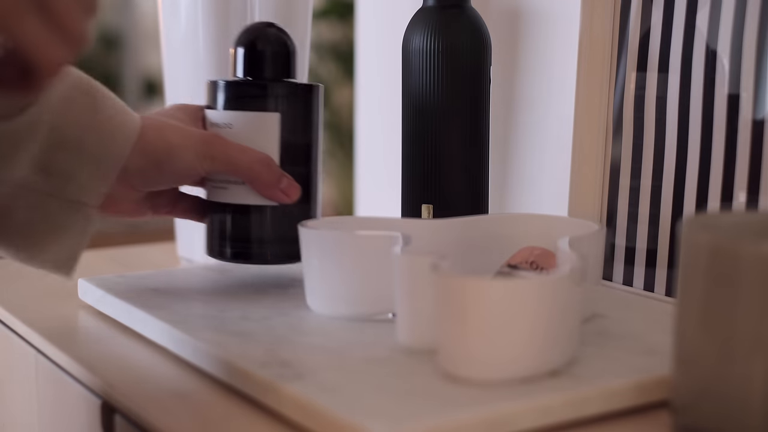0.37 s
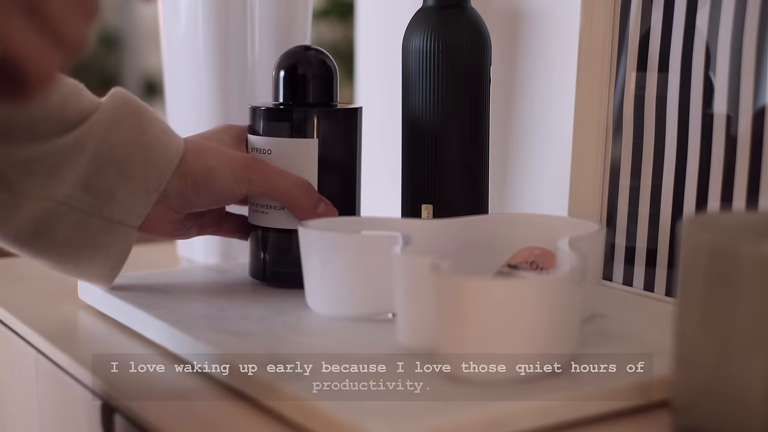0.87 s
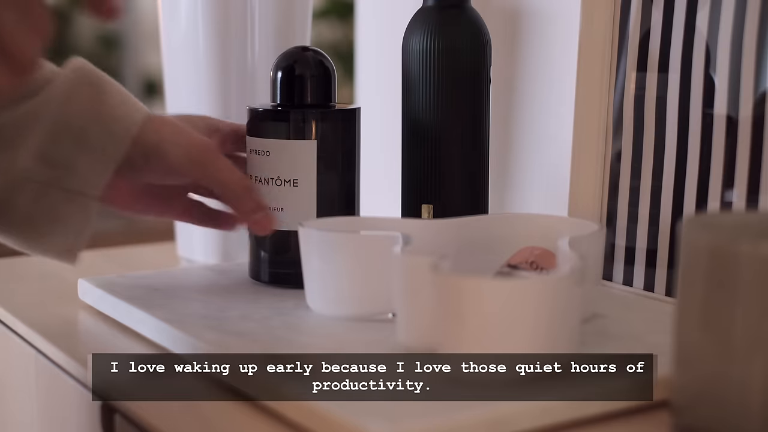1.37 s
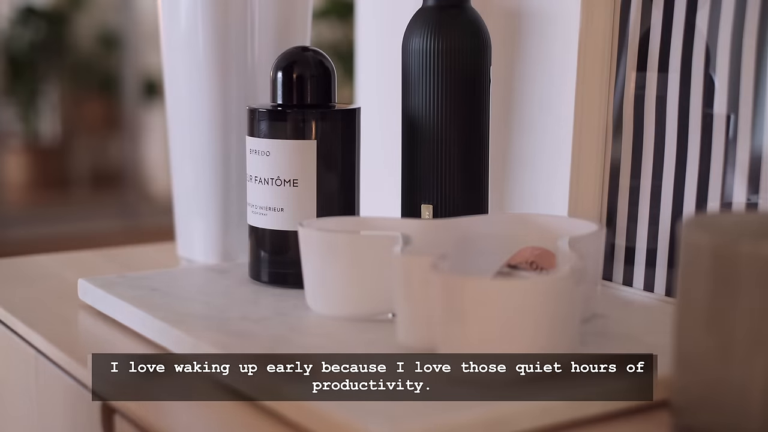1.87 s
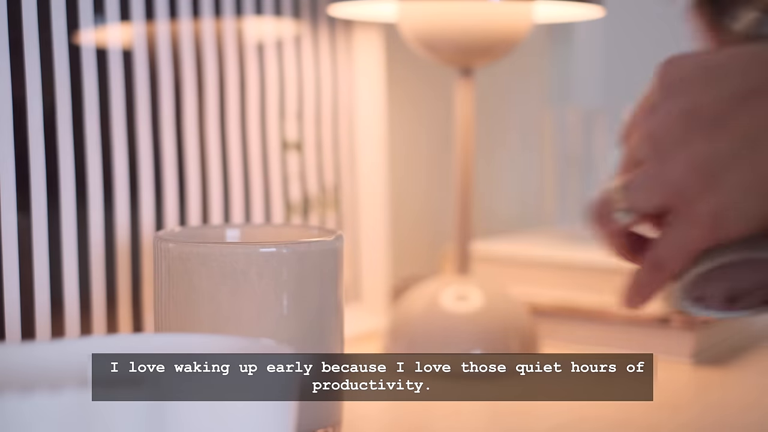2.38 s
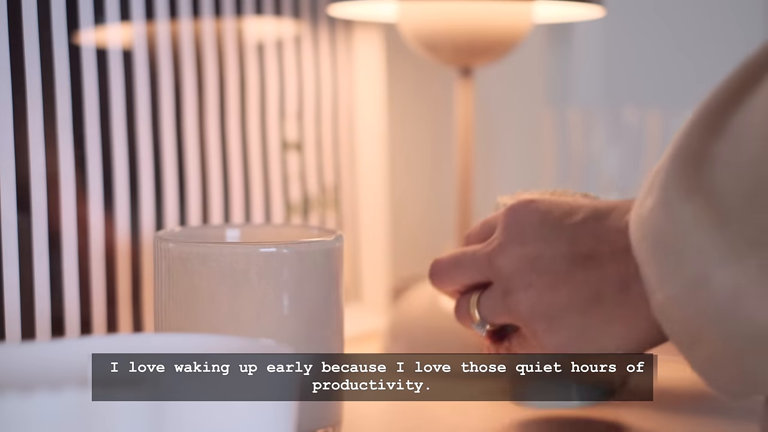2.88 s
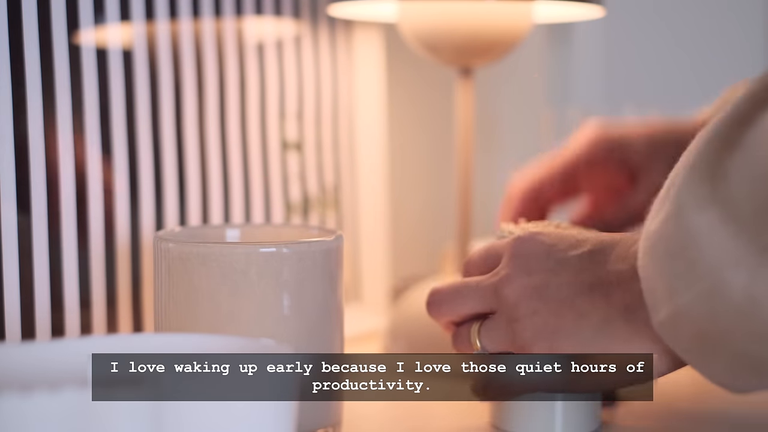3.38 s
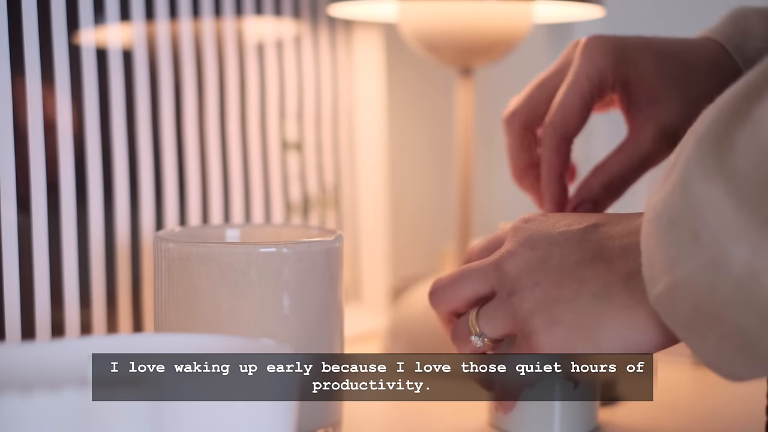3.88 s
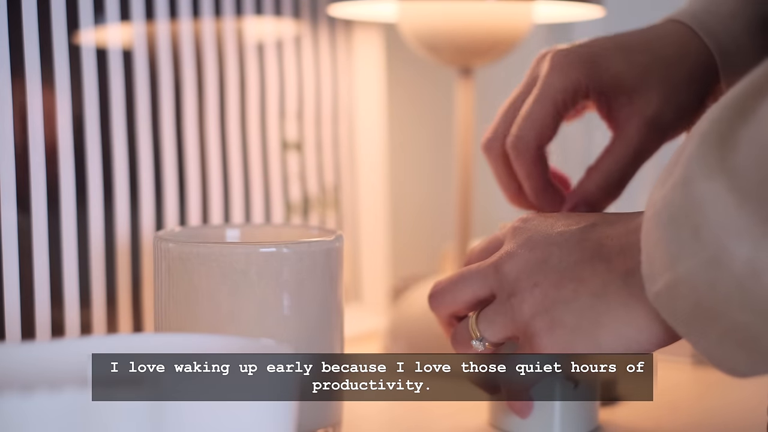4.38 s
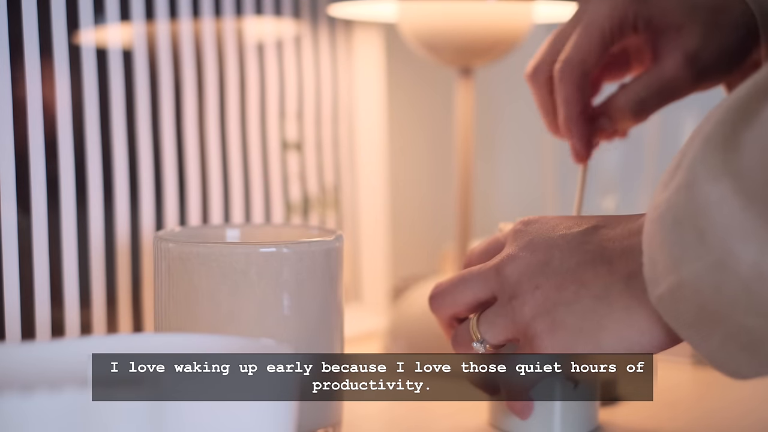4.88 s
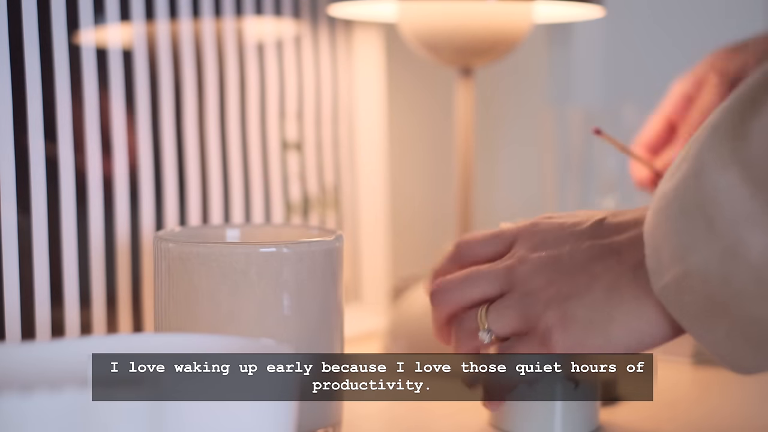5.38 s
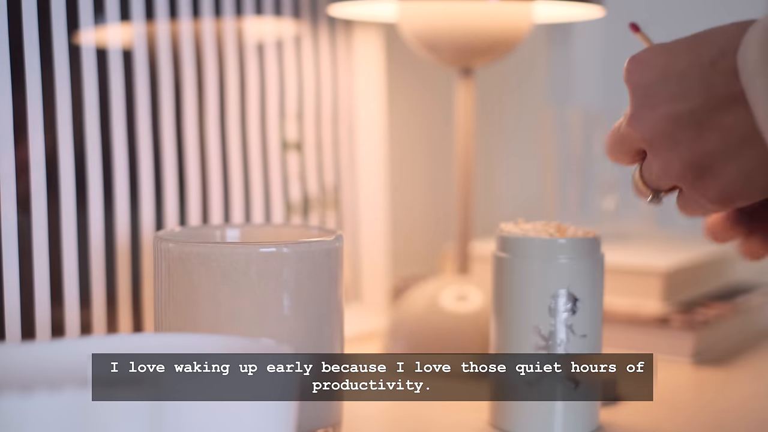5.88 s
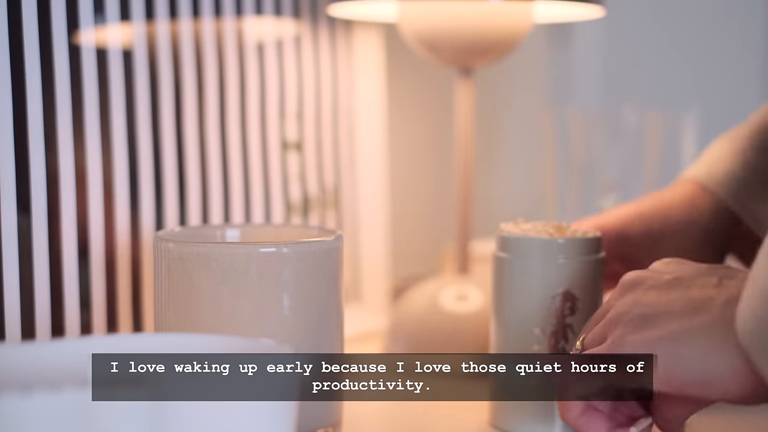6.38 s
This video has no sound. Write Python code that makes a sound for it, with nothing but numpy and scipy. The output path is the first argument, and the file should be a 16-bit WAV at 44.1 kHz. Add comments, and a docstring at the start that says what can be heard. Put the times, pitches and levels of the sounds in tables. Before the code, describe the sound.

In a quiet furnished room, a heavy glass bottle meets a stone slab with two crisp knocks and a small settling thump. A ceramic jar of long matches lands with a low thud and wooden rattle. Fingers stir the sticks in sparse dry clicks and pull one out. The jar scrapes briefly and a finger ring ticks on it. Close microphone, soft sleeve rustle, low air rumble and faint hiss.

```python
"""A glass bottle is set down on a stone slab, which rings like a set of dying sines; a sleeve brushes as soft noise.
A ceramic jar of long matches then lands on a table. Fingers stir the matches and draw one out: short noisy knocks
and fine clicks pass through wooden resonances. At the end the jar is slid aside and a finger ring ticks on it.
Air stirs at the microphone all along, in a quiet furnished room; one microphone feeds two channels,
and each channel adds its own hiss."""
import sys
import numpy as np
from scipy import signal
from scipy.fft import rfft, irfft
from scipy.io import wavfile

SR = 44100
rng = np.random.default_rng(int(sys.argv[2]) if len(sys.argv) > 2 else 0)


def field_ratio(decibels):
    """Amplitude ratio for a level in dB (20 dB per decade); scalars and array-likes work."""
    return 10 ** (np.asarray(decibels, dtype=float) / 20)


def output_pcm(signal):
    """Save a mono or channel-first signal as 16-bit PCM at the path in sys.argv[1].

    Samples are clipped to [-1, 1] before scaling.
    """
    pcm = np.clip(np.atleast_2d(signal).T, -1, 1) * 32767
    wavfile.write(sys.argv[1], SR, np.round(pcm).astype(np.int16))


N = 297278   # length in samples

# Source levels in the tables are before the gains in the functions.
# Bottle base meeting the slab: start_s, push_db, sharpness_hz
BOTTLE_CONTACTS = [(0.7353, -19.5, 1480), (0.7376, -29.5, 2140), (.95, -21.5, 1730), (0.9522, -36, 1590),
                   (1.214, -34, 400), (1.226, -33, 339), (1.243, -37, 300), (1.282, -46, 252)]
# Ringing of slab and bottle: pitch_hz, level_db, time_to_fall_60_db_s
SLAB_MODES = [(101.5, -22, 0.083), (157, -17, 0.117), (224, -10.5, 0.05), (319, -8, 0.02),
              (464, -5.5, 0.028), (663, -1, 0.036), (758, -5, 0.045), (870, -5, 0.037), (990, -8.5, 0.041),
              (1108, 0.5, 0.023), (1240, -0.5, 0.044), (1320, -7.5, 0.056), (1236, -26.5, 0.66),
              (1308, -29, .5), (1426, -7.5, 0.04), (1619, -3.5, 0.069), (1900, -0.5, 0.012),
              (2214, -4.5, .04), (2260, -21, 0.37), (2310, -19.5, .5), (2414, -5.5, 0.061),
              (2659, -3, 0.036), (2940, -6.5, 0.028), (3656, -12.5, 0.026), (4290, -32, 0.012),
              (5100, -14.5, 0.19), (7260, -32, .01)]
# Resonances of the gritty crack: pitch_hz, width_hz, level_db
GRIT_BODY = [(3560, 590, -16.5), (7820, 2400, -32)]
# Jar base meeting the table: start_s, push_db, sharpness_hz
JAR_CONTACTS = [(2.143, -47, 880), (2.195, -2.5, 207), (2.254, -34, 2020), (3.092, -18.5, 1910),
                (3.100, -50, 1430), (3.262, -43.5, 1600), (3.28, -38.5, 1010), (5.36, -46.5, 600),
                (6.257, -43, 2500), (6.355, -48, 2500)]
# Ringing of the table top: pitch_hz, level_db, time_to_fall_60_db_s
TABLE_MODES = [(94.1, -28.5, 0.022), (161, -12.5, 0.036), (211.8, -8, 0.021), (400, -7.5, 0.02),
               (508, -10, 0.026), (686, -6, 0.025), (771, -4, 0.038), (844, -7.5, 0.035), (865, -23.5, .3),
               (981, -4, 0.019), (1186, -4, 0.041), (1237, -24.5, 0.35), (1410, -9, .02),
               (1535, -2.5, 0.0134), (1590, -20, .3), (1678, -2, 0.032), (1945, -2, 0.026),
               (2175, -5.5, 0.02), (2510, -4, 0.013), (3060, 0.5, 0.013)]
# Ringing of the jar wall when no hand holds it: pitch_hz, level_db, time_to_fall_60_db_s
JAR_MODES = [(514, -16.5, .1), (747, -12.5, 0.11), (1667, -20, .1), (1790, -11.5, 0.056), (2885, -9, 0.026),
             (3290, -22, .15), (3605, -8, 0.41), (4450, -19.5, 0.08), (5440, -17, .5), (8670, -21, 0.097)]
# Short shoves of the jar over the table: peak_s, level_db, rise_s, fall_s
SHOVES = [(6.245, -47, .008, 0.038), (6.262, -42, 0.013, 0.077), (6.28, -46, 0.02, 0.077),
          (6.326, -54, 0.094, .012), (6.36, -48.5, 0.0069, 0.041)]
# Knocks of the sticks: start_s, level_db, then relative to that: hollow_db, middle_db, treble_db
STICK_KNOCKS = [(2.1959, -33, -11, -10, -14), (2.2046, -37.5, -19, -2, -1.5), (2.2181, -37.5, -21, -2, 0.5),
                (2.2392, -22, -12, -7, -15), (2.2487, -19, -4.5, -11, -16),
                (2.2512, -18.5, -17, -10, -11.5), (2.2543, -19, -3.5, -6, -14),
                (2.2653, -32, -10, -23, -23), (2.3311, -33.5, -28, -8, -24), (2.3474, -43.5, -9, -6, -13),
                (2.8166, -41, -18, -3.5, -22), (2.826, -23, -25, -10, -24.5), (2.837, -43, -35, -24.5, -9),
                (3.0925, -19.5, 0, -20, -32), (3.0985, -25.5, 8.5, -3.5, -24),
                (3.1019, -20, 1.5, -6.5, -19), (3.107, -30, -10, -18, -25), (3.7837, -53, -17, -4.5, -10),
                (3.7993, -48, -2.5, -0.5, -6), (3.8213, -51.5, -1, 0.5, -2), (3.9396, -41.5, -10, -9, -22),
                (3.9941, -48, -15, -9, -5), (4.0882, -39, -14.5, -22, -4.5), (4.091, -27.5, -20, -5, -16.5),
                (4.1027, -39.5, -5, -11, -13), (4.143, -45, -20, -1.5, -34), (4.2337, -51, -11, -6, -6),
                (4.3175, -40.5, -14, -8.5, -7.5), (4.3363, -37.5, -6, -12, -15),
                (4.3484, -42, -16, -11, -21), (4.3901, -26, -21, -12, -27), (4.588, -38, -26, -14, -35),
                (4.6135, -17, -21, -13, -19.5), (4.6288, -33, -10, -10, -10),
                (4.6337, -27.5, -20, -10, -20), (4.6396, -32, -16, -17, -9), (4.6463, -9, -23, -19.5, -23),
                (4.6673, -18.5, -20.5, -17.5, -26), (4.6764, -24, -31.5, -18, -31),
                (4.791, -35, -25, -16, -40), (4.8129, -36.5, -19, -19.5, -39),
                (4.9926, -32.5, -34, -13, -30), (5.007, -16, -18, -12, -12.5), (5.0234, -48, -15, -10, -21),
                (5.0411, -26.5, -23, -12, -16), (5.055, -32, -30, -9.5, -14),
                (5.1074, -21.5, -25, -16.5, -27), (5.1587, -37, -11, -5, -10), (5.1674, -40, -11, -8, -11),
                (5.3638, -54.5, -21, -6, -2)]
# Sticks and the air in the jar, in four groups (main, hollow, middle, treble): pitch_hz, width_hz, level_db
STICK_GROUPS = [
    [(1920, 357, 0.5), (2242, 260, 5), (2470, 180, 4.5), (2730, 230, 2.5)],
    [(764, 110, 11.5), (1180, 250, 13.5), (1488, 200, 11.5)],
    [(3885, 590, 11), (5045, 650, 8), (6470, 1560, -3)],
    [(7960, 1900, 7), (9100, 1310, 10.5), (11700, 2400, 2.5), (13100, 3900, 1), (14900, 940, -2)],
]
# Fingers stirring the sticks: peak_s, level_db, rise_s, fall_s
STIRRING = [(2.234, -45, 0.042, 0.13), (3.8, -69, 0.054, 0.26), (4.02, -66, 0.1, 1.1),
            (4.284, -62.5, 0.93, 0.49), (4.6, -66, 0.061, 0.84), (5.014, -52, 0.033, 0.18)]
# Finger ring ticking on the jar: start_s, level_db, length_ms
TICKS = [(6.5675, -19, 0.84), (6.5717, -27, 0.98), (6.6108, -25.5, 1.33)]
# Resonances of ring and glaze: pitch_hz, width_hz, level_db
TICK_BODY = [(940, 180, -17), (2520, 640, -12), (3320, 660, -13), (5440, 570, -11), (7710, 174, 2.5),
             (8000, 173, 3), (11300, 800, -18.5), (12700, 300, -10.5), (14500, 1000, -35)]
# Strokes of the sleeve: peak_s, level_db, rise_s, fall_s
SLEEVE_STROKES = [(.15, -73.5, 1.5, 0.31), (1.49, -70, 0.089, 0.74), (1.774, -64.5, 0.27, 0.085),
                  (1.91, -73, .4, 0.22), (2.5, -66, 0.43, 0.37), (2.704, -52.5, 0.24, 0.17),
                  (3.3, -71.5, 0.11, 0.073), (5.37, -70, 0.058, 0.037), (5.63, -69.5, .22, .16),
                  (5.78, -75, 0.054, .08), (6.17, -69, .35, 0.064)]
# Tone colour of the cloth, only its shape counts: pitch_hz, level_db (per Hz)
CLOTH_COLOUR = [(240, -48), (400, -16), (553, -9), (826, -6), (949, -8), (1530, -6), (4730, -2.5),
                (8630, -5), (16000, -22.5)]
# Gusts of air at the microphone: peak_s, level_db, rise_s, fall_s
GUSTS = [(.24, -63.5, .4, 0.21), (.73, -54, 0.11, .08), (1.1, -60.5, .5, 0.44), (1.9, -54.5, 0.33, 0.13),
         (2.18, -46, 0.08, .45), (2.78, -38, 0.29, 0.29), (3.08, -38, 0.11, 0.38),
         (3.52, -43.5, 0.13, 0.26), (3.7, -47, 0.37, 0.092), (4.2, -58.5, .9, .9),
         (4.66, -54.5, 0.27, 0.086), (5.08, -65, .06, .45), (5.61, -70, 0.53, .9)]
# Tone colour of the moving air, only its shape counts: pitch_hz, level_db (per Hz)
AIR_COLOUR = [(2, -22.0), (6, 7.5), (15, -10), (30, -15.5), (60, -46.0), (200, -83)]
# Steady background of the room: pitch_hz, level_db (per Hz)
ROOM_COLOUR = [(10, -90), (30, -83), (60, -92), (150, -94.5), (300, -101), (600, -104), (1200, -107),
               (2500, -113), (6000, -118), (12000, -125)]
# How long the echoes last: pitch_hz, time_to_fall_60_db_s
ECHO_TIMES = [(100, 0.69), (260, 0.61), (700, 0.62), (1840, 0.63), (4850, 0.34), (12000, 0.084)]
# Hiss of each channel: pitch_hz, level_db (per Hz)
HISS_COLOUR = [(30, -108.5), (150, -103), (1000, -109), (4000, -110), (15000, -110)]


def unit_rms(x):
    """Scales a sound to an average (rms) strength of one."""
    return x / np.sqrt(np.mean(x ** 2) + 1e-20)


def gestures(rows):
    """Loudness of gestures: each climbs 20 dB per rise time to its peak, then falls 20 dB per fall time."""
    t = np.arange(N // 32 + 2) * 32 / SR   # every 32nd sample is enough
    power = 0
    for peak_s, level_db, rise_s, fall_s in rows:
        before = (peak_s - t) / max(rise_s, .003)
        after = (t - peak_s) / max(fall_s, .003)
        away = np.where(t < peak_s, before, after)
        power = power + field_ratio(level_db - 20 * away) ** 2
    return np.interp(np.arange(N) / SR, t, np.sqrt(power))


def at_hz(points, hz):
    """Reads a table between its pitches, on a log-frequency axis."""
    table_hz, values = np.transpose(points)
    return np.interp(np.log(hz), np.log(table_hz), values)


def coloured(spectrum):
    """Noise whose power per Hz follows the spectrum."""
    hz = np.maximum(np.fft.rfftfreq(N, 1 / SR), 1)
    white = rfft(rng.standard_normal(N))
    return irfft(white * field_ratio(at_hz(spectrum, hz)), N) * np.sqrt(SR / 2)


def modes(force, table):
    """A push sets every mode ringing as a dying sine; neighbours start in opposite directions."""
    out = 0
    for k, (pitch_hz, level_db, t60_s) in enumerate(table):
        r = field_ratio(-60 / (max(t60_s, .004) * SR))   # what is left after one sample
        turn = 2 * np.pi * pitch_hz / SR
        ring = signal.lfilter([0, np.sin(turn)], [1, -2 * r * np.cos(turn), r * r], force + 1e-18)
        out = out + (-1) ** k * field_ratio(level_db) * ring
    return out


def resonances(x, table):
    """Broad resonances side by side favour the sound near their pitches; their signs alternate."""
    out = 0
    for k, (pitch_hz, width_hz, level_db) in enumerate(table):
        r = np.exp(-np.pi * width_hz / SR)
        b = (1 - r * r) / 2 * np.array([1, 0, -1])
        a = [1, -2 * r * np.cos(2 * np.pi * pitch_hz / SR), r * r]
        out = out + (-1) ** k * field_ratio(level_db) * signal.lfilter(b, a, x + 1e-18)
    return out


def blows(table):
    """Force of each contact: a smooth push whose total is set by its level, shorter when sharper."""
    force, t = np.zeros(N + 2000), np.arange(2000) / SR
    for start_s, push_db, sharpness_hz in table:
        push = t ** 2 * np.exp(-2 * np.pi * sharpness_hz * t)
        force[round(start_s * SR):][:len(t)] += field_ratio(push_db) * push / push.sum()
    return force[:N]


def bursts(starts_s, levels_db, lengths_ms):
    """Loudness of chattering contacts: each rises quickly and dies away over its length."""
    out, t = np.zeros(N + 2000), np.arange(2000) / SR
    for start_s, level_db, length_ms in zip(starts_s, levels_db, lengths_ms):
        span = t / (max(length_ms, .2) / 1000)
        shape = (1 - np.exp(-3.0 * span)) * np.exp(-span)
        out[round(start_s * SR):][:len(t)] += field_ratio(level_db) * shape
    return out[:N]


def grains(per_s, spread_db):
    """Tiny random clicks of uneven size, with the same mean power whatever their rate."""
    sizes = field_ratio(spread_db * np.minimum(rng.exponential(1, N), 4)) * rng.choice([-1, 1], N)
    per_s = np.clip(per_s, 20, SR)
    happens = rng.random(N) < per_s / SR
    return unit_rms(sizes) * happens * np.sqrt(SR / per_s)


def bottle():
    """The thick glass base knocks on the stone slab; grit in a sharp contact adds a brief crack."""
    start_s, push_db, sharpness_hz = np.transpose(BOTTLE_CONTACTS)
    grit_db = push_db + 40 * np.log10(sharpness_hz / 1600)   # a sharper contact cracks louder
    grit = bursts(start_s, grit_db, np.full(len(start_s), 8.0)) * rng.standard_normal(N)
    return field_ratio(8.0) * modes(blows(BOTTLE_CONTACTS), SLAB_MODES) + resonances(grit, GRIT_BODY)


def jar():
    """Blows and dragging shake table top and jar wall; the stirring hand presses on the table through the jar."""
    knock = blows(JAR_CONTACTS)
    # the filters soften the clicks of dragging a little, those of stirring a lot
    drag = gestures(SHOVES) * signal.lfilter([1], [1, -.6], grains(8000, spread_db=4.0))
    stir = gestures(STIRRING) * signal.lfilter([.05], [1, -.95], grains(600, spread_db=2.5))

    table = modes(knock + field_ratio(-29.5) * drag + field_ratio(-14) * stir, TABLE_MODES)
    # keeps the low leakage of the mode filters out of the table's sound
    no_bass = signal.butter(4, 120, "high", fs=SR, output="sos")
    table = signal.sosfilt(no_bass, table)

    # a hand round the wall shortens its ring
    held = [(pitch_hz, level_db, t60_s / 7.4) for pitch_hz, level_db, t60_s in JAR_MODES]
    wall_knock = modes(field_ratio(9.0) * knock, held)
    grip_s = 6.336   # the hand closes on the jar and stills the ring of the drag
    stilled = field_ratio(-30 * np.clip((np.arange(N) / SR - grip_s) / 0.004, 0, 1))
    wall_drag = stilled * modes(field_ratio(-20.5) * drag, JAR_MODES)
    return field_ratio(4.5) * table + wall_knock + wall_drag


def sticks():
    """Knocks and fine rustle of wooden sticks sound through the same four groups of resonances."""
    start_s, level_db, hollow_db, middle_db, treble_db = np.transpose(STICK_KNOCKS)
    chatter_ms = np.full(len(start_s), 2.25)
    rustle = gestures(STIRRING) * grains(2600, spread_db=3.0)
    chatter = rng.choice([-1, 1], N)
    knock_shares_db = (0 * start_s, hollow_db, middle_db, treble_db)
    rustle_shares_db = (-5.5, -21.5, -4.5, -8)
    out = 0
    for group, share_db, rustle_db in zip(STICK_GROUPS, knock_shares_db, rustle_shares_db):
        knock = bursts(start_s, level_db + share_db, chatter_ms) * chatter
        out = out + resonances(field_ratio(6) * knock + field_ratio(rustle_db) * rustle, group)
    return out


def finger_ring():
    """Metal ticks on glaze: very short bursts of noise through narrow and broad resonances."""
    ticks = bursts(*np.transpose(TICKS)) * rng.standard_normal(N)
    return field_ratio(14) * resonances(ticks, TICK_BODY)


def sleeve():
    """Cloth on cloth, a smooth bright hiss that swells and fades with each stroke."""
    return gestures(SLEEVE_STROKES) * unit_rms(coloured(CLOTH_COLOUR))


def draught():
    """Slow lumps of air pressure on the diaphragm, swelling in gusts over a faint steady stir."""
    still_air_db = -68
    return (field_ratio(still_air_db) + gestures(GUSTS)) * unit_rms(coloured(AIR_COLOUR))


def room(x):
    """Dense echoes: noise in octave bands, each dying at its own pace, building up over a few ms."""
    t, echoes = np.arange(SR) / SR, 0
    for low_hz in 60 * 2. ** np.arange(8):
        octave = signal.butter(2, [low_hz, 2 * low_hz], "band", fs=SR, output="sos")
        band = signal.sosfilt(octave, rng.standard_normal(SR))
        echoes = echoes + band * field_ratio(-60 * t / at_hz(ECHO_TIMES, low_hz * np.sqrt(2)))
    echoes = echoes * (1 - np.exp(-t / 0.0021))
    echoes = echoes / np.sqrt(np.sum(echoes ** 2))   # unit energy
    return field_ratio(-15.5) * signal.fftconvolve(x, echoes)[:N]


def room_tone():
    """The steady faint noise of the quiet room, strongest in the bass."""
    return coloured(ROOM_COLOUR)


def scene():
    """All sound meets one microphone; the small ticks stir the room less than the knocks."""
    knocks = bottle() + jar() + sticks()
    ticks = finger_ring()
    echoes = room(knocks + field_ratio(-16) * ticks)
    heard = knocks + ticks + echoes + sleeve() + draught() + room_tone()
    return np.tile(heard, (2, 1))   # the same signal on both channels


def low_pass(x):
    """Removes everything above the highest recorded frequency."""
    return signal.sosfilt(signal.butter(12, 16610, fs=SR, output="sos"), x)


def record(dry):
    """Each channel adds hiss of its own, then a steep filter cuts the very top."""
    hissy = dry + [coloured(HISS_COLOUR), coloured(HISS_COLOUR)]
    top_cut = signal.cheby2(12, 60, 16650, fs=SR, output="sos")   # 60 dB down from 16650 Hz
    mix = signal.sosfilt(top_cut, hissy)
    return low_pass(mix)


dry = scene()
out = record(dry)
output_pcm(out)
```